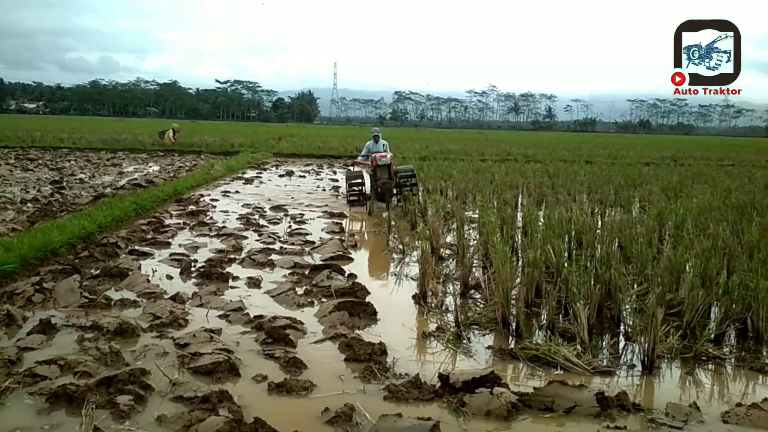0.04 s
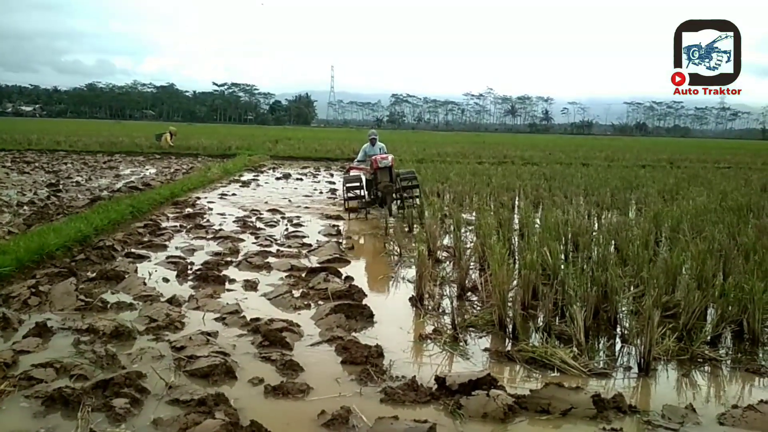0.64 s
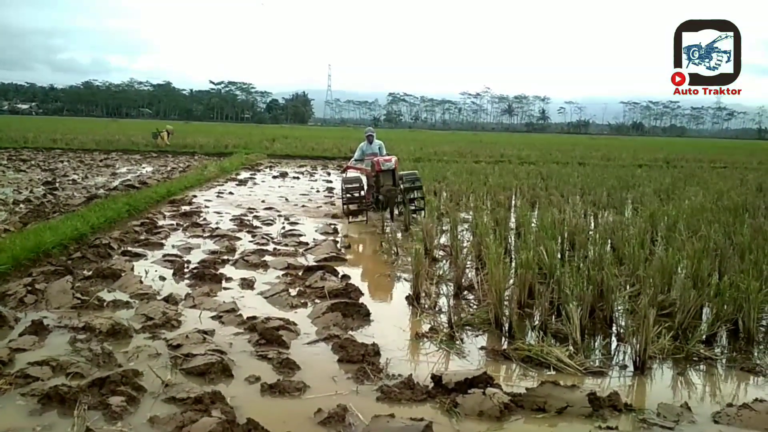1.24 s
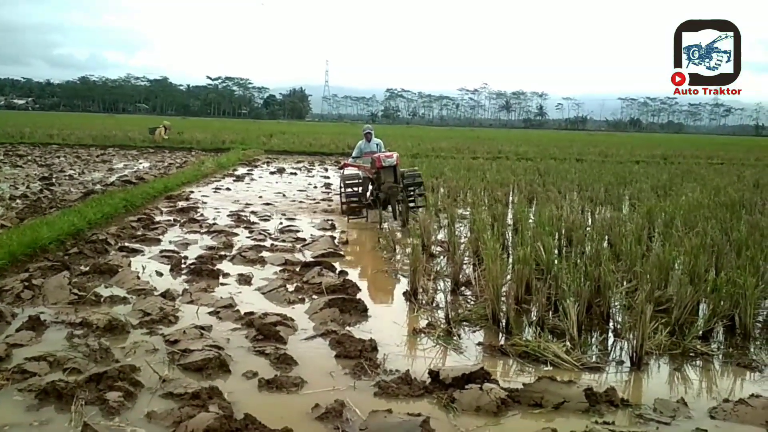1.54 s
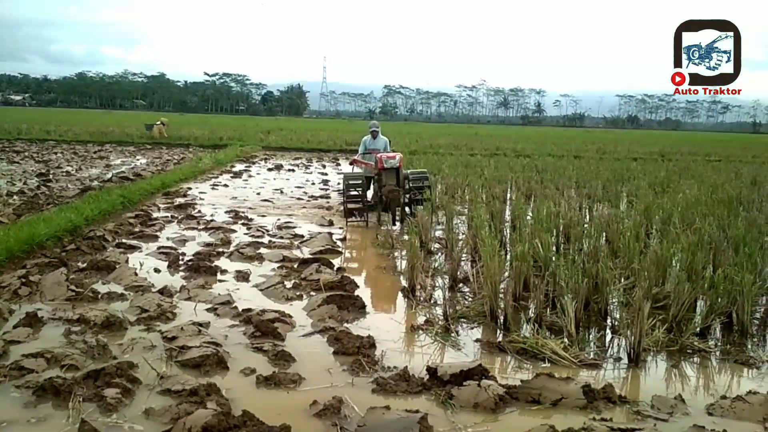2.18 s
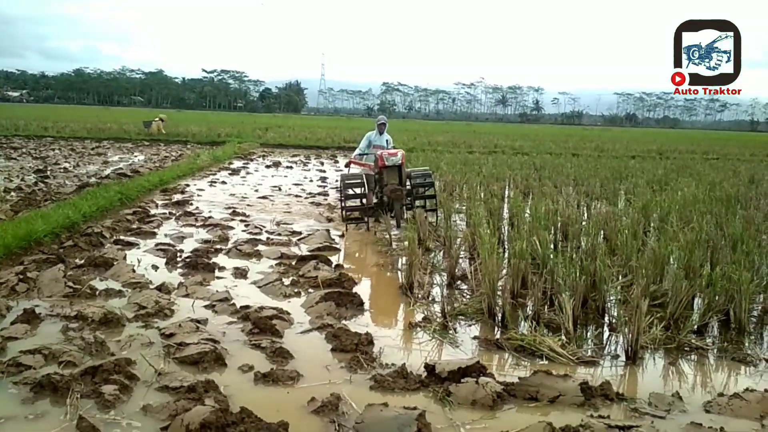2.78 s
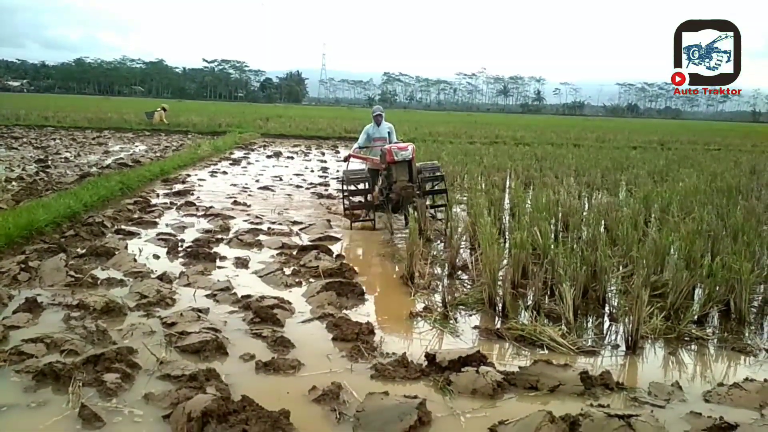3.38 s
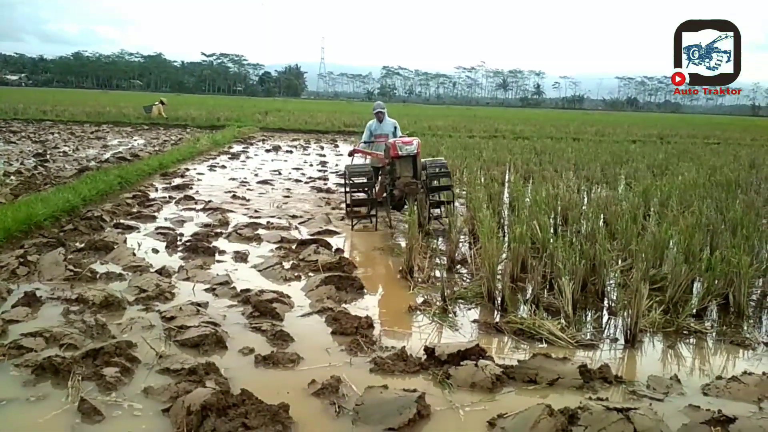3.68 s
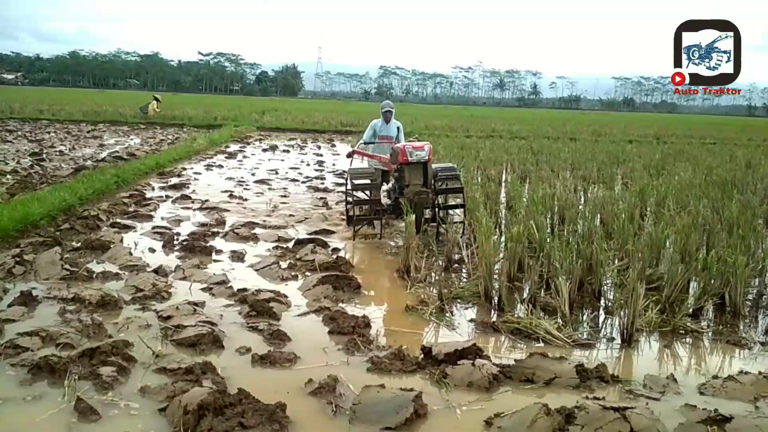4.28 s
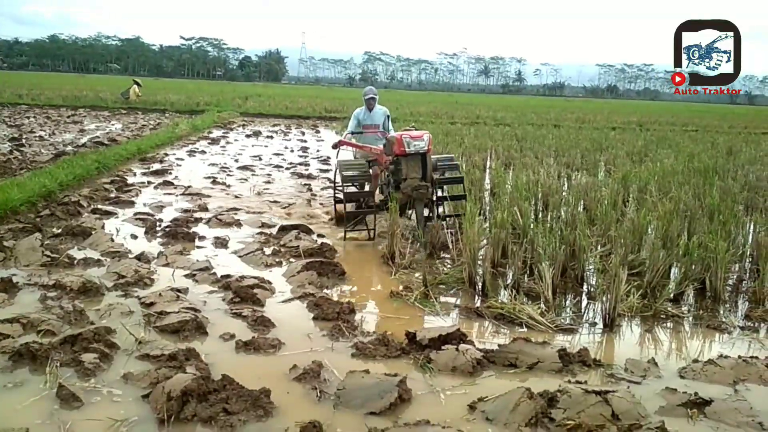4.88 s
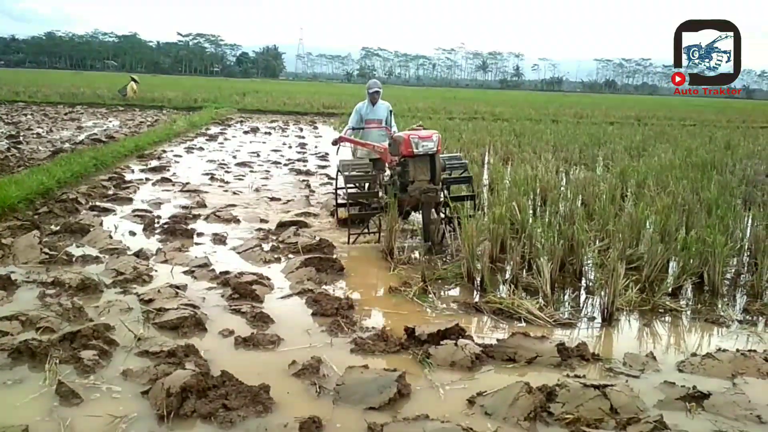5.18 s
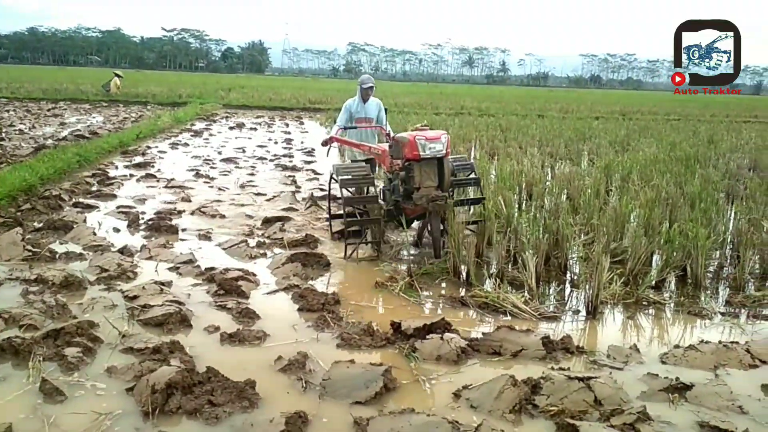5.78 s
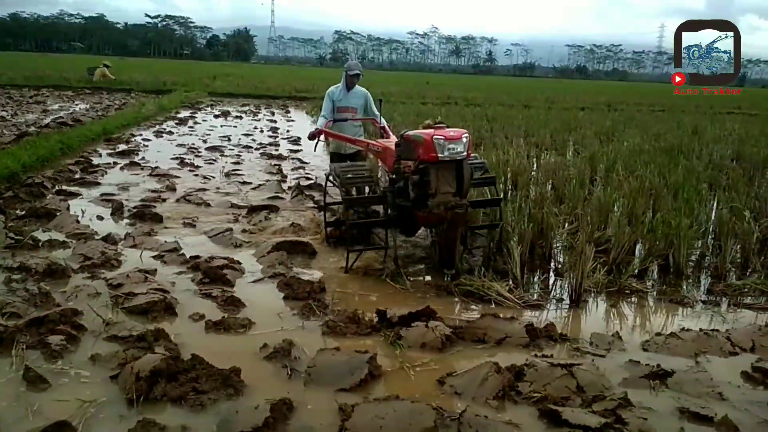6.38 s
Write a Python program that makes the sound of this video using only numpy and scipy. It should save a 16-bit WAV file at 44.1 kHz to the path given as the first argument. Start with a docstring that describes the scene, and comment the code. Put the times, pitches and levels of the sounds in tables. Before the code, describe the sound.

Outdoors in a wet field, a small diesel tractor works steadily towards the microphone, heard only on the right. Its engine thumps in a quick, regular rhythm, with knocking, rattling sheet metal and a light exhaust hiss, while the wheels faintly churn mud. Occasional slight pings and spits come through. The pace holds throughout, and the sound becomes louder and harsher as the machine gets close.

```python
"""A flooded field, open air. A hand tractor ploughs towards the microphone, from 14 m to about 6 m.
Its single-cylinder four-stroke diesel fires once in two turns of the crank: the fuel knocks and rings
the block, the exhaust thumps and hisses, and the intake gulps. Gears and tinwork clatter between the
firings and the cage wheels churn mud. One microphone, on the right channel; faint input noise on the left."""
import sys
import numpy as np
from scipy import signal
from scipy.fft import rfft, irfft, next_fast_len
from scipy.io import wavfile
from scipy.ndimage import uniform_filter1d

SR = 44100
rng = np.random.default_rng(int(sys.argv[2]) if len(sys.argv) > 2 else 0)


def inscribe(sig):
    """Save sig as 16-bit PCM at rate SR to the path in sys.argv[1].

    A 1-D sig is mono; a 2-D sig holds one channel per row.
    Samples are clipped to [-1, 1] before scaling.
    """
    pcm = np.round(np.clip(np.atleast_2d(sig).T, -1, 1) * 32767)
    wavfile.write(sys.argv[1], SR, pcm.astype(np.int16))


N = 284004
TIME = np.arange(N) / SR


def undb(db):
    """Decibels to gain."""
    return 10 ** (np.asarray(db) / 20)


def level(x, db=0):
    """Scale to an rms level."""
    return x * undb(db) / np.sqrt(np.mean(x ** 2))


def curve(table):
    """Join (time, value) points by straight lines."""
    return np.interp(TIME, *np.transpose(table))


def butter(x, order, hz, kind):
    """Butterworth filter."""
    return signal.sosfilt(signal.butter(order, hz, kind, fs=SR, output="sos"), x)


def colour(x, spectrum):
    """Shape a sound by (frequency, level) points."""
    hz, db = np.transpose(spectrum)
    size = next_fast_len(N)
    f = np.maximum(np.fft.rfftfreq(size, 1 / SR), 1)
    gain = undb(np.interp(np.log(f), np.log(hz), db))
    return irfft(rfft(x, size) * gain, size)[:N]


def ring(x, hz, width_hz):
    """A resonance: a unit click starts a fading wave of unit height."""
    r = np.exp(-np.pi * width_hz / SR)
    return signal.lfilter([.5, 0, -.5], [1, -2 * r * np.cos(2 * np.pi * hz / SR), r * r], x + 1e-18)


def clicks(times, sizes):
    """Clicks at the given times, each shared between two samples."""
    out, at = np.zeros(N + 1), times * SR
    keep = (at >= 0) & (at < N - 1)
    i, part = at[keep].astype(int), at[keep] % 1
    np.add.at(out, i, sizes[keep] * (1 - part))
    np.add.at(out, i + 1, sizes[keep] * part)
    return out[:N]


def scatter(spread_db, count):
    """Random gains around 1."""
    return undb(spread_db * rng.standard_normal(count))


def grit(spread_db, size):
    """Noise made of short grains of unequal strength."""
    return rng.standard_normal(N) * np.repeat(scatter(spread_db, N // size + 1), size)[:N]


# crank speed, held by the governor against the drag of the plough: t/s, firing rate/Hz
FIRING_RATE = [(0.0, 11.49), (0.8, 11.427), (2.95, 11.445), (3.65, 11.548), (4.8, 11.393), (5.3, 11.493),
               (6.05, 11.407), (6.44, 11.529)]

def crank(first_firing_s=0.0489):
    """Engine cycles, two turns each; fuel fires at whole numbers, and all angles count from there."""
    cycle = np.cumsum(curve(FIRING_RATE)) / SR
    return cycle - np.interp(first_firing_s, TIME, cycle)


def passes(cycle, degrees):
    """The times at which the crank passes an angle."""
    targets = np.arange(-1, int(cycle[-1]) + 1) + degrees / 720
    return np.interp(targets, cycle, TIME, left=-1, right=-1)


def burst(cycle, degrees, rise_deg, fall_deg, scatter_db):
    """An envelope that opens at a crank angle and dies away, its height different in every cycle."""
    count, age = np.divmod(720 * (cycle + 2) - degrees, 720)
    size = scatter(scatter_db, int(cycle[-1]) + 5)
    return size[count.astype(int)] * (1 - np.exp(-age / rise_deg)) * np.exp(-age / fall_deg)


def strike(cycle, blows, modes, scatter_db, mode_scatter_db, jitter_deg, rattle_db):
    """Blows in every cycle ring a part; loose joints keep it trembling afterwards."""
    count = int(cycle[-1]) + 2
    force = scatter(scatter_db, count)
    hits = [(passes(cycle, degrees + jitter_deg * rng.standard_normal(count)), force * undb(db))
            for degrees, db in blows]
    rattle = undb(rattle_db) * rng.standard_normal(N)
    rattle *= burst(cycle, blows[0][0], rise_deg=30, fall_deg=293, scatter_db=1)
    out = 0
    for hz, width, db in modes:
        drive = sum(clicks(times, size * scatter(mode_scatter_db, count)) for times, size in hits)
        out += undb(db) * ring(drive + rattle, hz, width)
    return out


def tinwork(x, ring_s=0.0077):
    """Thin sheet metal adds a short ring of countless small modes."""
    t = TIME[:1024]
    tail = butter(rng.standard_normal(len(t)) * np.exp(-t / ring_s), 2, 2000, "high")
    return x + signal.oaconvolve(x, tail / np.linalg.norm(tail))[:N]


# noise floor of the left channel: f/Hz, level/dB
INPUT_SPECTRUM = [(20, -9), (85, 5), (190, -4), (320, -15), (900, -17), (2000, -39), (6000, -45)]

def input_noise():
    """The input with no microphone on it gives only its own noise."""
    return colour(rng.standard_normal(N), INPUT_SPECTRUM)


# wet mud at the wheels: f/Hz, level/dB
MUD_SPECTRUM = [(400, -13), (1000, 7.5), (2500, -10.5), (5000, -12.5), (8000, -34.5), (15000, -40)]

def mud(slaps_per_s=7, swell_db=3):
    """The cage wheels churn wet mud in uneven splashes."""
    size = int(SR / slaps_per_s)
    steps = np.repeat(rng.standard_normal(200), size)[:N]
    swell = undb(swell_db * uniform_filter1d(steps, size))
    return colour(grit(2.6, size=16), MUD_SPECTRUM) * swell


# low roar under the beat: f/Hz, level/dB
RUMBLE_SPECTRUM = [(20, -2), (50, -4), (90, 5), (150, -3), (210, -5), (310, -1), (450, -23.5), (700, -26),
                   (2000, -47.5)]

def rumble():
    """Turbulent gas rumbles in the pipes."""
    return colour(rng.standard_normal(N), RUMBLE_SPECTRUM)


# shaken gears and sheet metal: f/Hz, level/dB
CLATTER_SPECTRUM = [(200, -9), (500, -3), (630, -2), (850, 9), (1600, 3), (2050, -15), (2600, -13),
                    (3300, -28), (4100, -16.5), (5200, -47), (7000, -44), (15000, -42)]

def clatter(cycle, steady=0.35):
    """Each firing shakes gears and tinwork, which never quite come to rest."""
    shake = steady + burst(cycle, 33, rise_deg=29, fall_deg=360, scatter_db=1.5)
    return tinwork(colour(grit(2.6, size=40), CLATTER_SPECTRUM) * shake)


# gas jet at the exhaust valve: f/Hz, level/dB
HISS_SPECTRUM = [(2000, 8.5), (2700, 1), (3300, -7), (3900, -32), (4900, -2), (6200, -7), (7000, -11),
                 (8800, -8.5), (10500, -6), (13000, -8.5), (15500, -18)]

def exhaust_hiss(cycle, steady=0.18):
    """Gas tears through the opening valve; the first sharp puff varies much from stroke to stroke."""
    flow = steady + burst(cycle, 180, rise_deg=15, fall_deg=140, scatter_db=2)
    puff = burst(cycle, 170, rise_deg=8, fall_deg=21, scatter_db=8.5)
    return tinwork(colour(grit(1.5, size=24), HISS_SPECTRUM) * (flow + puff))


def hollow_bark(cycle, hz=490, width_hz=110):
    """Rushing gas makes the cans of silencer and air filter sound hollow."""
    exhaust = burst(cycle, 73, rise_deg=29, fall_deg=112, scatter_db=0.5)
    intake = 0.99 * burst(cycle, 326, rise_deg=59, fall_deg=61, scatter_db=0.5)
    rush = rng.standard_normal(N) * (exhaust + intake)
    return ring(ring(rush, hz, width_hz), hz, width_hz)


# gas pushes and their pipe resonances: angle/deg, f/Hz, width/Hz, push length/ms, relative pressure
# rows: exhaust opens, suction behind it, intake opens, air filter can, piston draws, intake shuts,
# the pipe's overtone
GAS_PUSHES = [(166.5, 92, 44.6, 0.94, 0.43), (220.3, 121.5, 13.2, 0.61, -0.17),
              (379.16, 297, 23.7, 0.72, 0.46), (351.8, 412, 10.5, 0.3, 0.0091),
              (417.03, 283.9, 15.7, 1.096, 0.61), (596.9, 160.3, 19.5, 0.47, 0.17),
              (583.1, 343, 11.6, 0.69, 0.0726)]

def gas_thump(cycle, scatter_db=0.08, jitter_deg=0.36):
    """Rounded pushes at the valves ring the silencer and the intake pipe."""
    out, ms = 0, np.arange(-256, 257) * 1000 / SR
    for degrees, hz, width, push_ms, pressure in GAS_PUSHES:
        late, size = rng.standard_normal((int(cycle[-1]) + 2, 2)).T
        push = np.exp(-.5 * (ms / push_ms) ** 2)
        train = clicks(passes(cycle, degrees + jitter_deg * late), pressure * undb(scatter_db * size))
        out += ring(signal.oaconvolve(train, push / push.sum(), "same"), hz, width)
    return butter(out, 2, 48, "high")  # the microphone takes in little of the deepest bass


# igniting fuel: f/Hz, level/dB
CRACK_SPECTRUM = [(600, -2), (1100, 9.5), (1600, 7.5), (2100, -0.5), (2700, -14.5), (3400, -10.5),
                  (4200, -15.5), (5500, -22.5), (7000, -30.5), (15000, -36)]

def ignition_crack(cycle):
    """A short rasp as the fuel ignites."""
    rasp = colour(grit(0.6, size=20), CRACK_SPECTRUM)
    flash = burst(cycle, -11, rise_deg=28, fall_deg=49, scatter_db=1.25)
    return tinwork(rasp * flash)


# combustion, piston slap and its rebound: angle/deg, level/dB
KNOCK_BLOWS = [(-4, -5.5), (22, -4), (27.5, -8)]
# modes of the engine block and of its side cover: f/Hz, width/Hz, level/dB
BLOCK_MODES = [(887, 28, 5.5), (1024, 9.5, 0), (1224, 14.4, 4.5), (1369.5, 22, 9), (1916, 45, -8.5),
               (1942, 36, 2.5), (2243, 76, 6.5), (2517, 21, -12.5), (2931, 22.5, -8.5)]
COVER_MODES = [(1535, 70, -1), (1582, 62, 0)]

def knock(cycle):
    """Diesel knock in block and cover; oil films soften the blows, and small parts radiate no lows."""
    block = strike(cycle, KNOCK_BLOWS, BLOCK_MODES,
                   scatter_db=0.5, mode_scatter_db=0.5, jitter_deg=0.25, rattle_db=-36.5)
    cover = strike(cycle, KNOCK_BLOWS, COVER_MODES,
                   scatter_db=1.1, mode_scatter_db=0.8, jitter_deg=0.2, rattle_db=-35)
    return butter(block, 5, [680, 3200], "band"), butter(cover, 2, [1200, 2000], "band")


# gas surge into the silencer: angle/deg, level/dB
CAN_SURGES = [(135, 1)]
# modes of the silencer can: f/Hz, width/Hz, level/dB
CAN_MODES = [(410.3, 10.4, 0), (454.4, 16, 3), (491.6, 10, 0.5), (523.3, 6.4, -7)]

def can_ring(cycle):
    """The first surge of exhaust gas leaves the silencer can humming."""
    hum = strike(cycle, CAN_SURGES, CAN_MODES,
                 scatter_db=1, mode_scatter_db=3, jitter_deg=1.2, rattle_db=-32.5)
    return butter(hum, 3, [360, 580], "band")


# the rocker meets the exhaust valve and bounces: angle/deg, level/dB
ROCKER_TAPS = [(176, 0.5), (191, 4.5)]
# modes of the valve gear: f/Hz, width/Hz, level/dB
ROCKER_MODES = [(2490, 35, 10.5), (3746, 100, 7.5), (4180, 100, 2.5), (4380, 63, -13), (5630, 130, -5.5),
                (6300, 45, -10.5), (8230, 98, -12), (10960, 250, 19)]

def valve_ping(cycle):
    """The rocker rings as it opens the exhaust valve."""
    ping = strike(cycle, ROCKER_TAPS, ROCKER_MODES,
                  scatter_db=3, mode_scatter_db=2.5, jitter_deg=2.03, rattle_db=-22.5)
    return butter(ping, 3, [3000, 7500], "band")


# stray hard blows of the rocker: t/s, relative level/dB
HARD_BLOWS = [(0.157, -41), (0.5945, -32), (0.6814, -41), (2.081, -35), (2.605, -33.5), (4.2373, -36),
              (4.9591, -34), (6.247, -40)]

def hard_taps(gain_db=-1):
    """Now and then the rocker strikes the valve harder and a bright ping stands out."""
    times, db = np.transpose(HARD_BLOWS)
    blows = clicks(times, undb(db))
    ping = sum(undb(mode_db) * ring(blows, hz, width) for hz, width, mode_db in ROCKER_MODES)
    ping = butter(ping, 3, [3400, 7500], "band")
    return ping * undb(db.max() + gain_db) / np.abs(ping).max()


# sharp spits from the exhaust: t/s, relative level/dB
EXHAUST_SPITS = [(0.8656, -39), (4.958, -44.5), (5.3082, -38), (5.7422, -37), (6.0914, -38)]

def spits(fade_s=0.0032, gain_db=-3):
    """Now and then the exhaust spits a short bright tick."""
    times, db = np.transpose(EXHAUST_SPITS)
    onsets = clicks(times, undb(db + gain_db))
    envelope = signal.lfilter([1], [1, -np.exp(-1 / (fade_s * SR))], onsets + 1e-18)
    return butter(envelope * rng.standard_normal(N), 2, 4500, "high")


def nearing(db_per_halving, start_m=13.8, speed_m_s=1.27):
    """Gain, 1 at the start, as the tractor comes straight at the microphone at a walking pace."""
    distance = np.maximum(start_m - speed_m_s * TIME, 1)
    return undb(db_per_halving * np.log2(start_m / distance))


# at the microphone during the approach: t/s, level/dB
METAL_LEVEL = [(0, -43), (2.7, -39), (6.44, -34)]  # block and clatter
COVER_LEVEL = [(0, -37.5), (2, -32), (3.3, -31.5), (4.4, -33.5), (4.75, -40.5), (5.17, -42), (5.45, -33.5),
               (6.44, -32)]  # fades for a moment about 7.5 m out
BARK_LEVEL = [(0, -48.5), (4.6, -51.5), (6.44, -37.5)]  # the hollow silencer, strongest close by

def scene():
    """The crank times the engine's beat, which grows as the tractor nears the microphone."""
    cycle = crank()
    roar = level(rumble(), -38)
    block, cover = knock(cycle)
    chug = level(gas_thump(cycle), -22.5) + roar + level(valve_ping(cycle), -56.5)
    rasp = level(ignition_crack(cycle), -46.5) + level(exhaust_hiss(cycle), -59.5) + level(mud(), -53.5)
    metal = level(block) + level(clatter(cycle))
    bark = level(hollow_bark(cycle)) + level(can_ring(cycle), -0.5)
    # the deep thump carries further over the water than the treble
    microphone = nearing(3.5) * chug + nearing(8.5) * rasp + spits() + hard_taps()
    for sound, levels in (metal, METAL_LEVEL), (level(cover), COVER_LEVEL), (bark, BARK_LEVEL):
        microphone += undb(curve(levels)) * sound
    return np.array([level(input_noise(), -86.5), microphone])


def record(dry, gain_db=6, top_hz=15700):
    """The recorder amplifies and cuts the top."""
    return signal.sosfilt(signal.ellip(8, .2, 70, top_hz, fs=SR, output="sos"), undb(gain_db) * dry)


dry = scene()
out = record(dry)
inscribe(out)
```